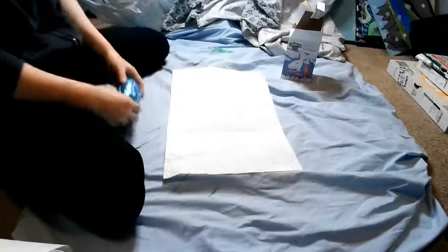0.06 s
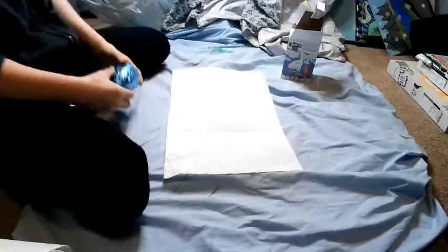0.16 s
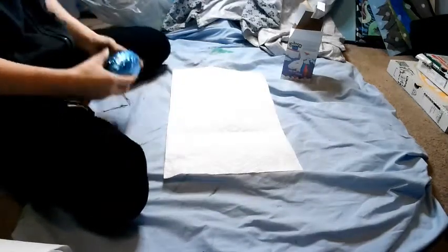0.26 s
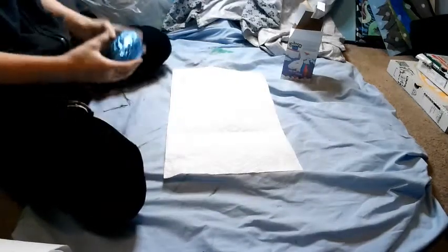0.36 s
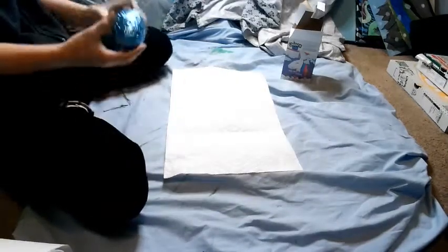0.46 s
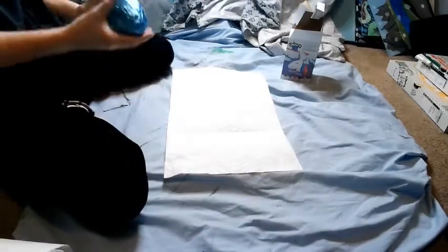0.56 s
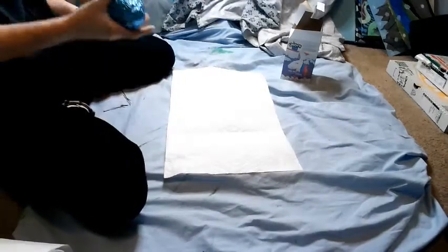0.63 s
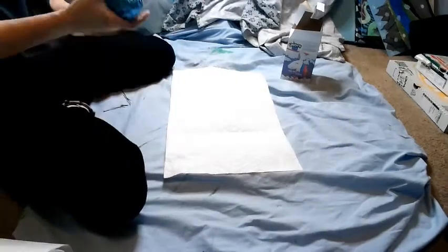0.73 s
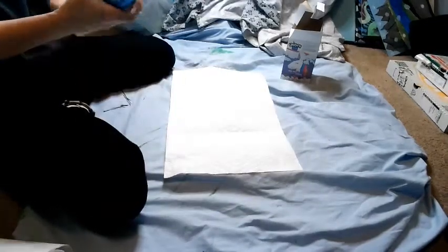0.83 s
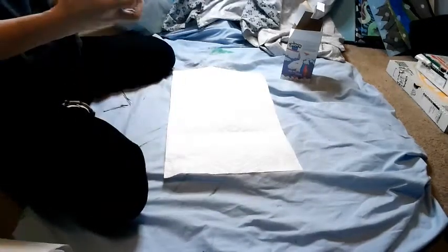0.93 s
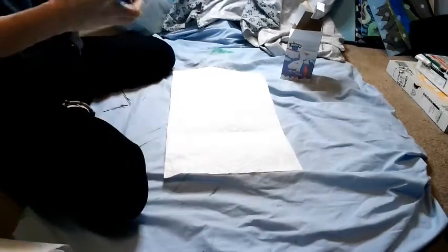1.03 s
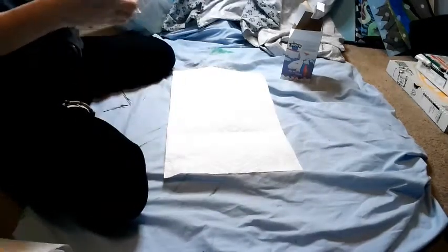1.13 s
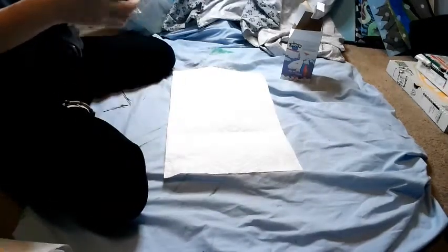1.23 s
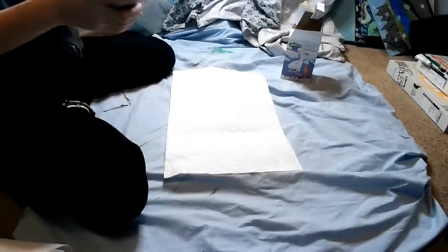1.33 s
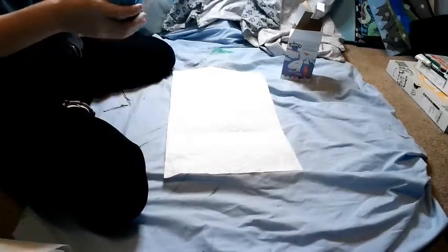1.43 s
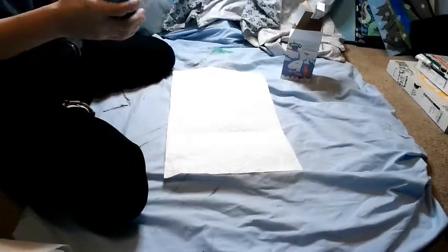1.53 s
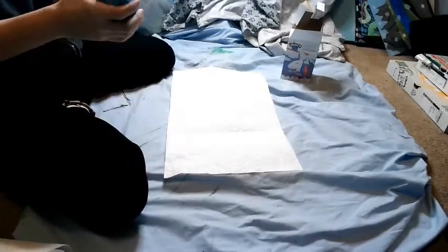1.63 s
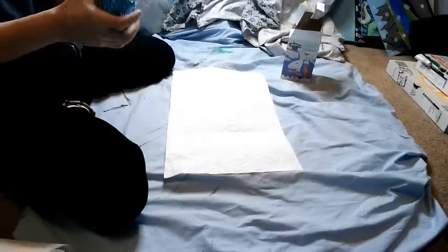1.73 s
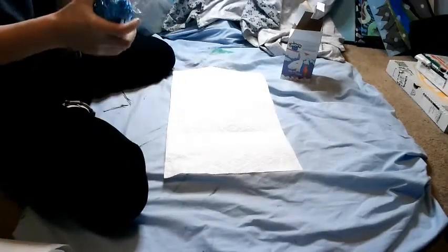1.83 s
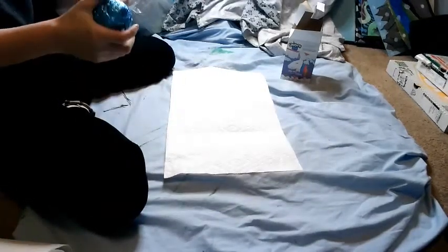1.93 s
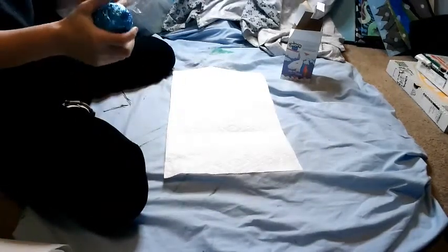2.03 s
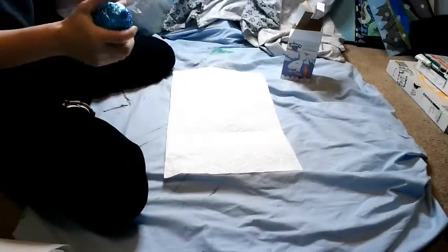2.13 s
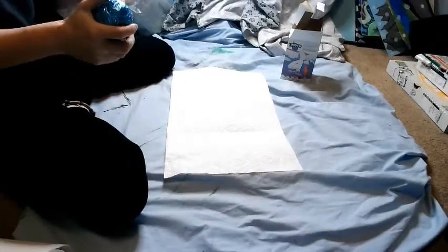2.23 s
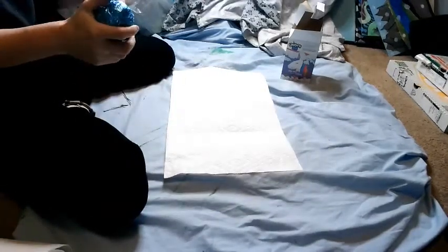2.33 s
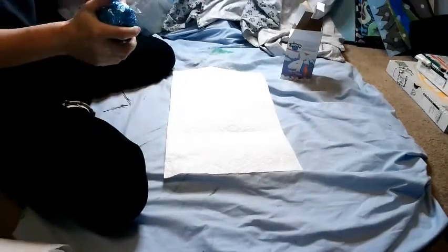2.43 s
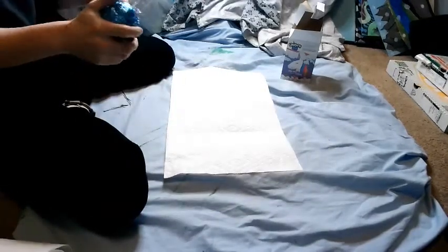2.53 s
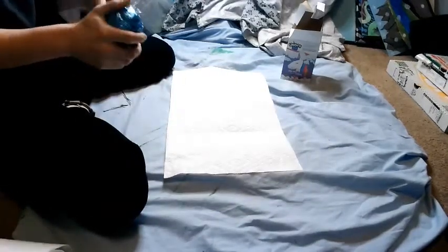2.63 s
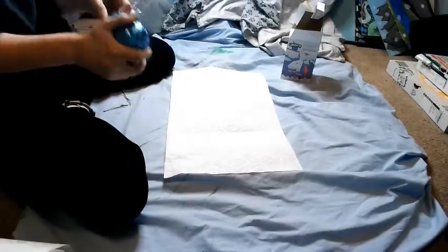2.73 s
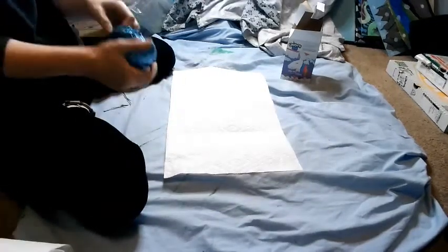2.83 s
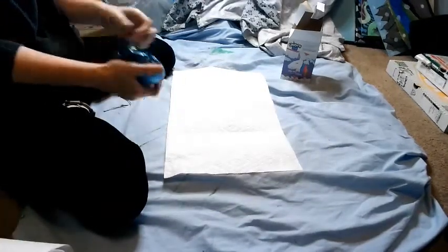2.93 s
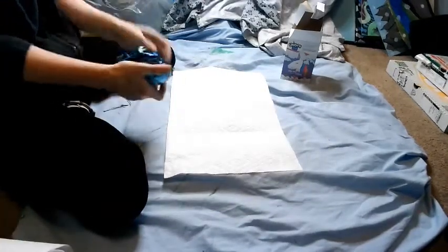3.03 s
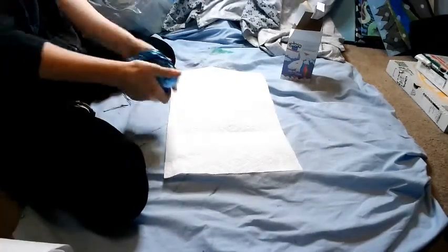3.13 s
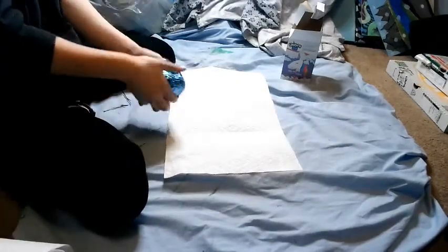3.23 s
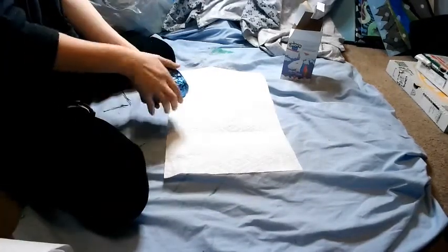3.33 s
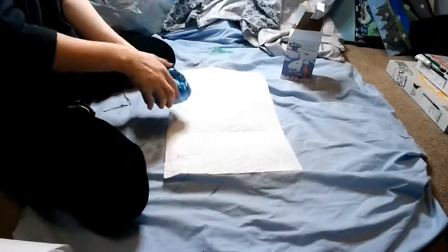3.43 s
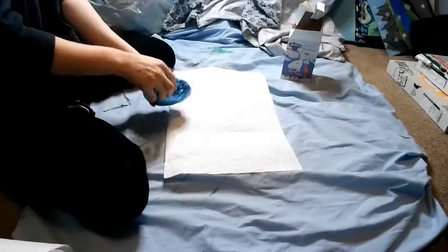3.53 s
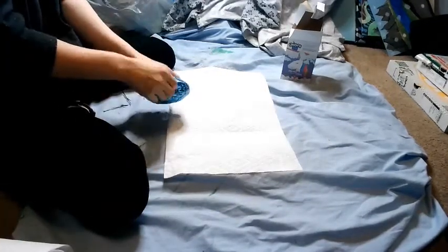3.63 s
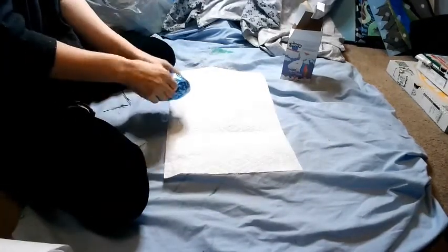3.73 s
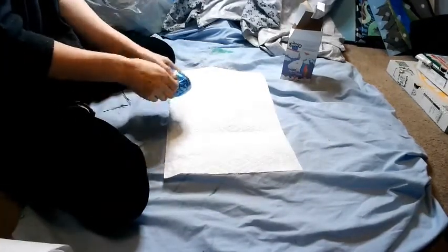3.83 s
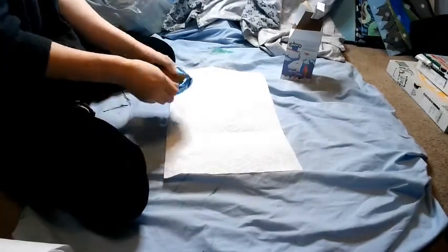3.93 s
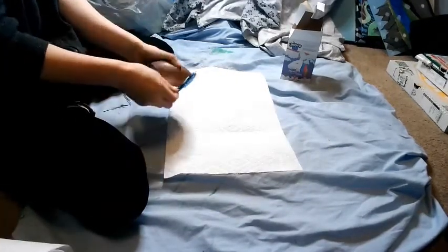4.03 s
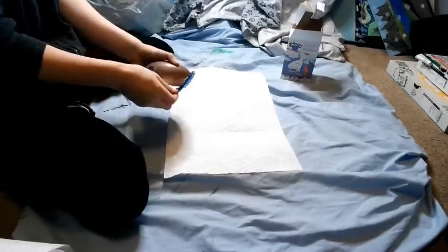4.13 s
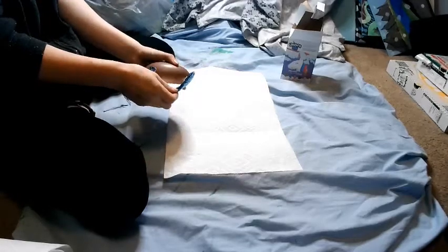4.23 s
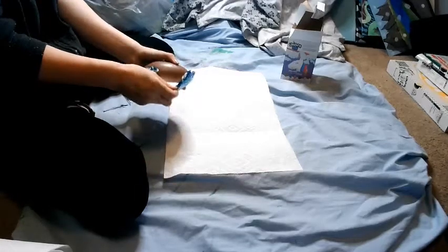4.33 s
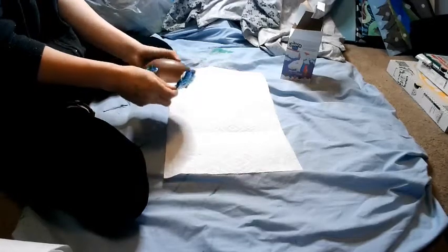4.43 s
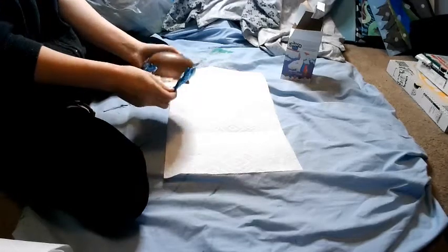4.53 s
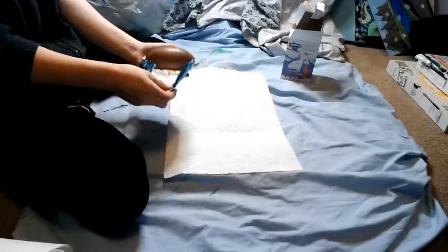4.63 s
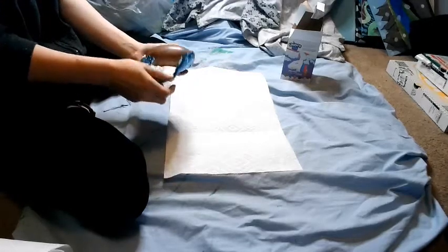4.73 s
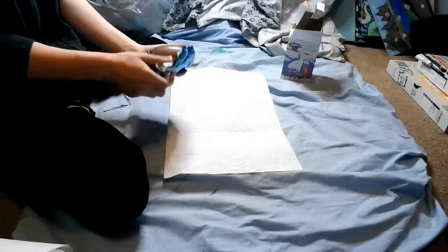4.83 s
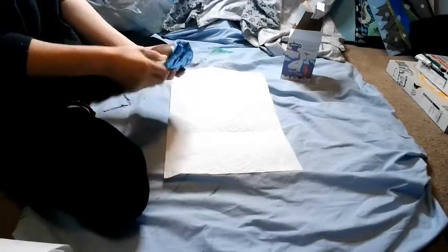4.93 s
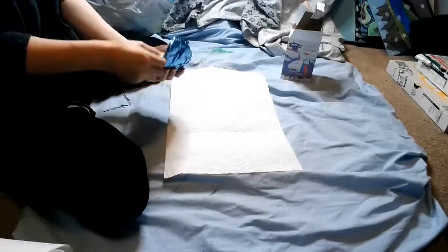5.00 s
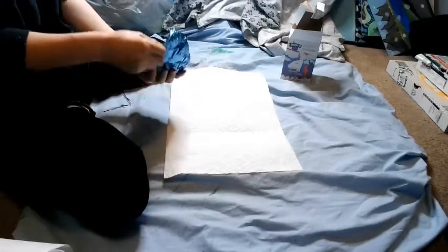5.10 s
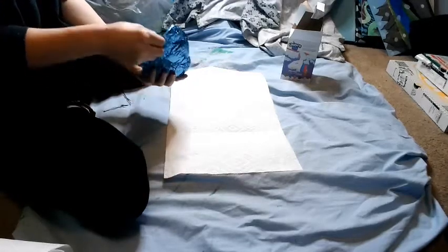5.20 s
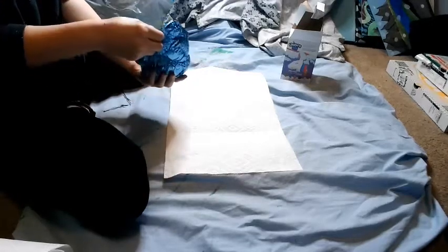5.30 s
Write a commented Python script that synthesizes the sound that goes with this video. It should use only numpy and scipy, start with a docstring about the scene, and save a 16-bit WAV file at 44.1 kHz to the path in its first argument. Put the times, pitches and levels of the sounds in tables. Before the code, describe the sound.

Close, dry foil handling in a quiet, soft-furnished room. At first fingertips brush the thin wrapper with faint hiss and sparse tiny ticks; past the midpoint the grip firms and sharp snaps and crackles crowd together. Later the foil scrapes a hollow chocolate shell, with small dull knocks and a soft sleeve rumble. A faint low machine drone throbs unevenly behind. One microphone, little deep bass, dulled top.

```python
"""Fingers brush over thin foil, then peel it off a hollow chocolate egg in a quiet, soft-furnished room.
Creases snap as clicks and short rings, tiny facets crackle as random grains, flaps rustle lower down.
Foil scrapes the shell, heard through its modes; in the second half fingers knock on it and sleeves rumble.
Behind the hands a machine's uneven drone throbs faintly, with a thin whine, mains hum and room air.
Hands and shell sound through a short room; one microphone with little deep bass and dull treble takes it all."""
import sys
import numpy as np
from scipy import signal
from scipy.fft import rfft, irfft, next_fast_len
from scipy.io import wavfile
from scipy.ndimage import uniform_filter1d, map_coordinates

SR = 44100
rng = np.random.default_rng(int(sys.argv[2]) if len(sys.argv) > 2 else 0)


def inscribe(sig):
    """Save sig as 16-bit PCM at rate SR to the path in sys.argv[1].

    A 1-D sig is mono; a 2-D sig holds one channel per row.
    Samples are clipped to [-1, 1] before scaling.
    """
    pcm = np.round(np.clip(np.atleast_2d(sig).T, -1, 1) * 32767)
    wavfile.write(sys.argv[1], SR, pcm.astype(np.int16))


N = 236328
TIME = np.arange(N) / SR


def amp(db):
    """Decibels to gain."""
    return 10 ** (np.asarray(db) / 20)


def unit(x):
    """x at rms 1."""
    return x / np.sqrt(np.mean(x ** 2) + 1e-20)


def along(points, hz):
    """(Hz, value) points read on a log frequency axis."""
    f, v = np.transpose(points)
    return np.interp(np.log(hz + 1), np.log(f + 1), v)


def level(rows):
    """(s, dB) rows as a gain per sample, at -120 dB before the first."""
    return amp(np.interp(TIME, *np.transpose(rows), left=-120))


def wobble(rate):
    """A smooth random curve of rms 1, rate knots a second."""
    knots = rng.standard_normal(int(N * rate / SR) + 4)
    fine = map_coordinates(knots, [np.arange(6 * len(knots)) / 6])  # cubic, six points per knot
    return unit(np.interp(TIME * rate * 6, np.arange(len(fine)), fine))


def filtered(x, response):
    """x times a response of frequency."""
    m = next_fast_len(N + SR // 2)
    return irfft(rfft(x, m) * response(np.fft.rfftfreq(m, 1 / SR)), m)[:N]


def coloured(x, spectrum, size=2048):
    """x through a causal, minimum-phase filter of energy 1 with this spectrum."""
    cepstrum = irfft(np.log(amp(along(spectrum, np.fft.rfftfreq(size, 1 / SR)))))
    # fold the cepstrum onto positive times
    cepstrum[1:size // 2] *= 2
    cepstrum[size // 2:] = 0
    response = irfft(np.exp(rfft(cepstrum)))
    return signal.oaconvolve(x, response / np.linalg.norm(response))[:N]


def add(track, s, sound):
    """Mix a sound into the track at time s."""
    part = track[max(round(s * SR), 0):][:len(sound)]
    part += sound[:len(part)]


def grains(rate, spread_db, centre_hz, scatter, cycles, size=56):
    """Tiny facets flip at random: each rings a few cycles at its own pitch, and few are large."""
    count = int(rate * N / SR)
    when, strength, pitch = rng.random((count, 3)).T
    hz = np.clip(centre_hz * np.exp(scatter * (2 * pitch - 1)), 200, SR / 3)[:, None]
    turns = (hz * np.arange(size) / SR).astype(np.float32)
    gain = amp(spread_db * np.minimum(-np.log(1 - strength), 3.5))
    ring = np.sin(2 * np.pi * turns) * np.exp(-turns / cycles)
    rings = gain[:, None] * np.sqrt(hz) * ring  # high pitches die sooner, so they start louder
    at = (when * N).astype(int)[:, None] + np.arange(size)
    return unit(np.bincount(at.ravel(), rings.ravel(), N)[:N])


# Finger strokes on the foil. Each row: time of full strength in seconds, attack in seconds per 20 dB,
# hold in seconds, then the drive in dB of the crinkle, of the bending flaps and of the scrape on the shell.
FINGER_STROKES = [(-0.004, 0.042, 0.13, -64, -70, -75), (0.184, 0.036, 0.098, -59.5, -66.5, -92),
                  (0.37, 0.16, 0.023, -56.5, -83, -91), (0.533, 0.13, 0.049, -52, -88, -93),
                  (0.602, 0.097, 0.049, -58, -64, -83), (0.722, 0.045, 0.027, -55.5, -65, -93),
                  (0.8, 0.084, 0.033, -48.5, -81, -92), (0.912, 0.045, 0.034, -58, -79, -90),
                  (1.02, 0.055, 0.1, -65, -73, -97), (1.18, 0.13, 0.046, -56.5, -75, -90),
                  (1.307, 0.013, 0.017, -55, -80, -73), (1.416, 0.071, 0.14, -51, -87, -89),
                  (1.647, 0.048, 0.024, -49.5, -77, -81), (1.8, 0.097, 0.15, -60.5, -78, -76.5),
                  (1.949, 0.064, 0.025, -52.5, -66, -87), (2.032, .04, 0.075, -63.5, -74, -88),
                  (2.155, 0.007, 0.0069, -49, -85, -86), (2.218, 0.011, 0.12, -55.5, -65, -90),
                  (2.378, 0.11, 0.081, -49.5, -53, -72.5), (2.527, 0.0093, 0.03, -54.5, -60, -95),
                  (2.642, 0.026, 0.021, -40.5, -55, -73), (2.723, 0.0045, 0.013, -49, -49, -85),
                  (2.791, 0.041, 0.027, -39, -50.5, -81), (2.83, 0.011, 0.034, -38, -47, -81),
                  (2.882, .04, 0.062, -47.5, -56, -85), (2.962, .002, 0.031, -43.5, -56, -79),
                  (3.033, 0.063, 0.032, -37, -43, -60.5), (3.236, 0.0092, 0.11, -60.5, -66, -79),
                  (3.36, 0.044, 0.02, -48, -52.5, -68), (3.463, 0.076, 0.011, -41, -52.5, -76),
                  (3.53, 0.11, 0.13, -50, -59.5, -71), (3.608, 0.0054, 0.037, -43.5, -46, -68),
                  (3.695, 0.074, 0.031, -45, -51.5, -67), (3.76, .02, 0.044, -51.5, -65, -62.5),
                  (3.797, 0.004, 0.0096, -38.5, -43, -63), (3.878, .01, 0.13, -60.5, -62, -76),
                  (3.993, 0.003, 0.015, -41, -43.5, -68), (4.041, .002, 0.016, -49, -46.5, -80),
                  (4.068, 0.0035, 0.025, -36.5, -47.5, -83), (4.135, 0.02, 0.021, -36, -42, -57),
                  (4.186, 0.011, 0.042, -44.5, -49.5, -56), (4.218, 0.0067, 0.014, -39.5, -46.5, -56.5),
                  (4.37, 0.004, .1, -61, -57, -82), (4.438, .005, 0.046, -51, -60, -61.5),
                  (4.48, 0.006, 0.02, -47.5, -45, -48), (4.518, .02, .02, -52, -51, -52),
                  (4.544, 0.003, 0.0089, -41.5, -40.5, -57), (4.599, 0.05, 0.041, -40, -47, -60),
                  (4.7, 0.028, 0.069, -37, -47, -58.5), (4.829, 0.012, 0.0045, -44, -49, -53.5),
                  (4.95, 0.057, 0.019, -43, -52, -58.5), (4.984, 0.012, 0.013, -35.5, -45, -56.5),
                  (5.135, 0.062, 0.08, -47, -52.5, -61), (5.245, 0.065, 0.096, -50.5, -60.5, -72)]
RELEASE_S = 0.056  # a stroke fades by 20 dB in this time


def strokes():
    """Each stroke swells, holds and fades; it drives the crinkle, the flaps and the scrape by its own amounts."""
    power = np.zeros((3, N))
    for s, attack, hold, *drive_db in FINGER_STROKES:
        before = np.maximum(s - TIME, 0) / max(attack, .002)
        after = np.maximum(TIME - s - hold, 0) / RELEASE_S
        away = before + after
        near = away < 4  # down to -80 dB
        power[:, near] += np.outer(amp(drive_db), amp(-20 * away[near])) ** 2
    return np.sqrt(power)


# Colour of fingertips sliding over the foil. Each row: frequency in Hz, relative level in dB.
BRUSH_COLOUR = [(300, -34), (1500, -17.5), (3000, -17), (4500, -4), (6000, 5.5), (7500, 3), (9500, 1.5),
                (10800, -1), (12500, -9), (15500, -22)]
# Colour of the foil's crackle and of its shivering sheet. Each row: frequency in Hz, relative level in dB.
FOIL_COLOUR = [(300, -36), (1200, -44), (2500, -11), (3600, -6), (4800, -0.5), (6500, 2.5), (8500, 2),
               (10000, -3), (12000, -11.5), (15500, -21)]
RESTING_DB = -74.5  # drive of the foil rustling in the hands between strokes


def crinkle(drive, brush_db=1.5, crackle_db=-1.5, firm_db=-42, grit_db=1.5, clump_db=1.5, tick_db=-5.0):
    """A light touch hisses and ticks over the foil; the firmer the grip, the more its facets crackle."""
    stroke = np.hypot(drive, amp(RESTING_DB))
    firm = stroke / (stroke + amp(firm_db))
    gritty = rng.standard_normal(N) * amp(grit_db * wobble(900))
    hiss = unit(coloured(gritty, BRUSH_COLOUR))
    # now and then a larger facet flips and rings a little longer
    ticks = grains(rate=130, spread_db=3.5, centre_hz=6000, scatter=.45, cycles=1.5, size=96)
    brush = amp(brush_db) * hiss + amp(tick_db) * unit(coloured(ticks, BRUSH_COLOUR))
    crackle = grains(rate=2000, spread_db=2.5, centre_hz=5730, scatter=0.58, cycles=1.2, size=80)
    foil = amp(crackle_db) * unit(coloured(crackle, FOIL_COLOUR))
    touch = np.sqrt(1 - firm) * brush + np.sqrt(firm) * foil
    return stroke * touch * amp(clump_db * wobble(110))


# The larger creases that buckle. Each row: start in seconds, level in dB before gain_db, facet pitch in Hz,
# level of the shell's tick in dB relative to the snap before shell_db, ring's t60 in seconds.
CREASES = [(0.09, -49.5, 4950, -25, 0.0078), (.1795, -46, 7400, -25, 0.0047), (.193, -47, 8150, -30, .004),
           (.3558, -48, 7250, -30, 0.0045), (.365, -43.5, 8700, -17, .005), (0.374, -42, 7600, -30, 0.0032),
           (.4228, -42.5, 6660, -24, 0.0057), (.4565, -36.5, 7080, -38, 0.0088),
           (.471, -45, 6600, -30, .005), (0.5138, -47, 8100, -30, .004), (0.5175, -38.5, 7300, -35, 0.0047),
           (0.7343, -36, 6030, -39, 0.0028), (0.881, -49, 6000, -8, 0.0017),
           (.927, -41.5, 8700, -21, 0.0036), (.9893, -50, 4570, -40, 0.0073),
           (1.078, -46, 6840, -22, 0.0021), (1.198, -41, 6700, -22, 0.0035),
           (1.3084, -42, 6000, -12, 0.0045), (1.2885, -50.5, 6540, -25, 0.003),
           (1.4004, -44, 8450, -28, 0.0047), (1.4187, -43, 6400, -16, 0.0048),
           (1.5243, -44, 7200, -28, 0.0038), (1.542, -48, 5900, -25, .005),
           (1.644, -40.5, 6300, -28, 0.0055), (1.649, -40, 8300, -30, 0.006),
           (1.6776, -46, 7100, -30, .004), (1.6828, -41, 6960, -30, 0.0048),
           (1.8113, -45.5, 6200, -28, 0.0058), (1.9475, -41, 5930, -28, .004),
           (1.953, -44.5, 5080, -33, 0.0035), (2.085, -48, 5330, -30, .005),
           (2.142, -46.5, 4550, -19, 0.0067), (2.153, -36.5, 5100, -30, 0.0035),
           (2.2173, -31.5, 5080, -26.5, 0.003), (2.27, -43, 5800, -40, 0.0045),
           (2.2947, -40, 5270, -23, 0.0036), (2.332, -39, 5000, -13.5, 0.0038),
           (2.407, -38.5, 8500, -28, 0.0038), (2.428, -36, 5070, -29, 0.0046),
           (2.4525, -40, 9200, -6.5, 0.0045), (2.5154, -36.5, 5540, -18.5, 0.0079),
           (2.519, -38, 5500, -22, .005), (2.5638, -45.5, 4960, -32, 0.0054),
           (2.5873, -39, 4750, -18, 0.0073), (2.622, -32.5, 5300, -20, 0.0037),
           (2.6302, -35, 6960, -30, .004), (2.639, -28.5, 5070, -26, 0.0058),
           (2.6493, -29.5, 4900, -25, 0.0047), (2.6538, -32, 6000, -20, .003),
           (2.6632, -30, 5000, -19.5, 0.0038), (2.6823, -34, 6240, -30, 0.0028),
           (2.7216, -23, 5730, -45, 0.0038), (2.7419, -34, 6500, -32, .004),
           (2.7634, -28.5, 6030, -21, 0.0038), (2.7664, -33, 4900, -28, 0.0032),
           (2.7897, -32, 5500, -25, .003), (2.7947, -20.5, 5300, -23, .0018),
           (2.802, -28, 8300, -43, 0.0031), (2.8095, -27, 7440, -38, 0.0044),
           (2.8238, -18, 4170, -19.5, 0.0034), (2.8256, -27, 4360, -17, 0.0035),
           (2.833, -28, 5500, -33, .003), (2.858, -29, 5330, -35, .004), (2.8411, -23, 5230, -45, 0.0053),
           (2.863, -27, 5300, -30, 0.004), (2.897, -24.5, 6160, -43, 0.0039), (2.924, -35, 5850, -28, .003),
           (2.935, -36, 5150, -30, 0.0033), (2.9555, -21.5, 4840, -29, 0.005),
           (3.013, -36, 5500, -25, .004), (3.032, -32.5, 4500, -30, .004), (3.1, -39, 7000, -33, .003),
           (3.1153, -32, 5830, -38, 0.0056), (3.2379, -40.5, 7150, -13, 0.0043),
           (3.272, -28, 6800, -45, 0.0058), (3.291, -37.5, 6600, -30, .005),
           (3.3161, -40.5, 4960, -28, 0.0045), (3.3248, -37, 6840, -16, .005),
           (3.339, -36, 4740, -9, 0.0067), (3.3571, -31.5, 3700, -14, 0.0028),
           (3.365, -35, 5400, -10, 0.0044), (3.3717, -36.5, 6340, -27, 0.0041),
           (3.4665, -36, 6730, -6, 0.0035), (3.471, -33, 7000, -14, 0.003), (3.5456, -42, 7050, -30, .003),
           (3.6154, -34, 6700, -6.5, 0.0044), (3.7077, -32, 6130, -36, 0.007),
           (3.7696, -35, 4950, -22, 0.0022), (3.7994, -43, 5000, -3, 0.0057),
           (3.8056, -43, 6900, -18, .004), (3.824, -33, 7600, -28, .003), (3.828, -31.5, 7300, -36, 0.004),
           (3.8948, -33, 8700, -23, 0.0026), (3.969, -44, 6500, -28, 0.005),
           (3.995, -29, 4480, -7.5, 0.0039), (3.9961, -31, 4900, -10, 0.0065),
           (4.007, -39, 6060, -25, .005), (4.0355, -27, 5650, -15, 0.0029), (4.0498, -34, 6740, -25, .005),
           (4.0564, -33, 5900, -27, 0.006), (4.0684, -22.5, 7400, -14.5, 0.0022),
           (4.0846, -29, 7740, -31, .004), (4.1024, -25.5, 6100, -30, .003), (4.116, -34, 6000, -35, .004),
           (4.1187, -25.5, 5300, -42, .004), (4.1218, -30, 6500, -35, .003), (4.135, -29, 5800, -17, .004),
           (4.1455, -25.5, 5750, -25, 0.0047), (4.152, -27, 5800, -25, .004),
           (4.165, -31, 5450, -28, 0.0036), (4.1719, -30, 6300, -30, 0.0034),
           (4.2111, -28.5, 5470, -30, 0.0054), (4.219, -32, 5040, -7, .002),
           (4.2279, -24.5, 5340, -12, 0.0023), (4.2306, -33, 5370, -9, 0.0046),
           (4.2412, -28.5, 6700, -18, 0.0082), (4.307, -49, 7500, -20, 0.004),
           (4.3673, -37.5, 4300, -17, 0.0073), (4.4265, -32, 6140, -29, 0.0043),
           (4.4585, -34.5, 5540, -6, 0.003), (4.4742, -32, 6240, -14, 0.0039),
           (4.4822, -35.5, 4860, -3, 0.0076), (4.52, -35, 5900, -20, .004), (4.5295, -38, 4200, -18, .004),
           (4.5469, -27.5, 7140, -11, 0.0067), (4.5761, -25, 3720, -44, 0.0056),
           (4.6323, -28, 4730, -9.5, 0.0034), (4.6349, -27, 7240, -34, 0.0057),
           (4.6633, -30, 4900, -32, 0.0037), (4.687, -40, 7450, -17, .005), (4.701, -32, 7600, -28, .004),
           (4.7046, -27, 7700, -36, 0.0035), (4.7235, -32, 6450, -30, .004),
           (4.757, -27, 6900, -30, 0.0034), (4.761, -26, 7900, -34, 0.0051),
           (4.8255, -23.5, 3300, -8, 0.0013), (4.8415, -42, 3200, -10, .005), (4.943, -41, 6050, -20, .005),
           (4.984, -29, 7700, -26, 0.0044), (4.9854, -39, 3400, -25, 0.0093),
           (4.9998, -30, 8200, -32, 0.0092), (5.0296, -31.5, 5900, -13.5, 0.0042),
           (5.1312, -37, 4900, -21, 0.0044), (5.156, -42, 5330, -20, 0.0056),
           (5.1816, -35.5, 6900, -30, .005), (5.2644, -29.5, 5430, -11, 0.0029),
           (5.311, -24.5, 6650, -43, 0.0021), (5.313, -35, 6600, -38, 0.0074),
           (5.325, -33, 5160, -24, 0.0054), (5.3474, -40, 7600, -32, 0.0041)]
# Colour of contact with the shell, scraped or ticked. Each row: frequency in Hz, relative level in dB.
CONTACT_COLOUR = [(40, -71), (120, -18), (240, -17), (370, -5.5), (480, -2.5), (680, -3.5), (1000, -5.5),
                  (1400, -3), (2100, 2), (2800, 2), (4000, -4.5), (9000, -52)]


def snaps(upper=1.503, upper_db=-7, crack_db=-7.5, shiver_db=-18, shiver_t60=0.032, gain_db=8,
          shell_db=-8.0, cutoff=0.62, reach=2.02, click_db=-9, click_s=.00036):
    """A crease pops: a click sweeps down, the facet rings briefly, the sheet shivers and the shell ticks."""
    facets, sheet, shell = np.zeros((3, N))
    t = np.arange(SR // 30) / SR
    rise = 1 - np.exp(-(t / .00011) ** 2)
    ticking = amp(shell_db - 60 * t / 0.012)
    flash = (t / click_s) ** 2 * np.exp(1 - (t / click_s) ** 2)
    for s, db, hz, under_db, t60 in CREASES:
        ringing = rise * amp(-60 * t / t60)
        burst = np.hypot(amp(crack_db) * ringing, amp(shiver_db - 60 * t / shiver_t60))
        crack, tick = rng.standard_normal((2, len(t)))
        second_hz = min(hz * upper, 10000) * np.exp(0.091 * rng.standard_normal())
        ring = np.sin(2 * np.pi * hz * t) + amp(upper_db) * np.sin(2 * np.pi * second_hz * t)
        # treble leads: the click sweeps down through the facet's pitch as it peaks
        turns = hz * click_s * (3 - 4 * click_s / (t + click_s))
        click = amp(click_db) * flash * np.sin(2 * np.pi * turns)
        # a facet radiates little far below or above its own pitch
        band_hz = [min(cutoff * hz, SR / 5), min(reach * hz, SR / 2.4)]
        thin = signal.butter(2, band_hz, "band", fs=SR)
        add(facets, s, amp(db) * signal.lfilter(*thin, ring * ringing + click))
        add(sheet, s, amp(db) * signal.lfilter(*thin, crack * burst))
        add(shell, s, amp(db + under_db) * tick * ticking)
    return amp(gain_db) * (facets + coloured(sheet, FOIL_COLOUR) + coloured(shell, CONTACT_COLOUR))


# Colour of bending flaps. Each row: frequency in Hz, relative level in dB.
FLAP_COLOUR = [(400, -27), (1000, -24.5), (1800, -11), (2800, -3.5), (4000, 2), (5500, 1), (9000, -38)]


def folds(drive, rub_db=-3, gain_db=0, clump_db=2.0):
    """Broad flaps bend with a fine, dry rustle, lower than that of the small facets."""
    flips = grains(rate=1800, spread_db=2, centre_hz=3034, scatter=0.654, cycles=1.5, size=96)
    rub = amp(rub_db) * rng.standard_normal(N)
    texture = unit(coloured(flips + rub, FLAP_COLOUR))
    return texture * drive * amp(gain_db + clump_db * wobble(90))


# Modes of the hand-damped shell. Each row: frequency in Hz, relative level in dB, t60 in seconds.
SHELL_MODES = [(182, -18, 0.073), (319, -1, 0.13), (366, 3.5, 0.091), (507, -5.5, 0.078), (661, 2, 0.058),
               (725, -3, 0.083), (1385, -2, 0.18), (1784, 9, 0.029), (2080, 10.5, 0.054), (2664, 9, 0.053),
               (3280, -13, .04)]


def scrape(drive, rub_db=-2, gain_db=-1, clump_db=2.5, ring_db=-2):
    """Foil sticks and slips on the shell, whose modes give the crackle a lower, hollow voice."""
    slips = grains(rate=600, spread_db=2.5, centre_hz=1180, scatter=0.98, cycles=0.22, size=160)
    rub = amp(rub_db) * rng.standard_normal(N)
    texture = unit(coloured(slips + rub, CONTACT_COLOUR))
    contact = texture * drive * amp(gain_db + clump_db * wobble(60))
    t = np.arange(SR // 6) / SR
    ring = sum(amp(db - 60 * t / t60) * np.sin(2 * np.pi * hz * t) for hz, db, t60 in SHELL_MODES)
    hollow = unit(signal.fftconvolve(contact, ring)[:N]) * contact.std()
    return contact + amp(ring_db) * hollow


def flexing(x, patchy_db=2.5, size=512):
    """As the sheet bends, its narrow resonances shift from moment to moment."""
    z = signal.stft(x, nperseg=size)[2]
    field = uniform_filter1d(rng.standard_normal(z.shape), size=5, axis=0)  # smooth over frequency
    field = uniform_filter1d(field, size=7, axis=1)  # and over time
    return unit(signal.istft(z * amp(patchy_db * unit(field)), nperseg=size)[1][:N]) * x.std()


# Knocks on the bare shell. Each row: start in seconds, level in dB before the thud's and modes' own gains,
# frequency in Hz of the modes that the spot favours.
SHELL_KNOCKS = [(2.781, -49.5, 700), (3.997, -45, 750), (4.054, -55, 1400), (4.135, -48, 700),
                (4.147, -47, 620), (4.2195, -43, 1400), (4.228, -38.5, 745), (4.483, -39, 633),
                (4.498, -41, 600), (4.531, -48, 600), (4.5388, -39.5, 1400), (4.548, -44, 750),
                (4.700, -42.5, 367), (4.826, -42, 405), (4.839, -36, 343), (4.954, -43, 356),
                (4.965, -45.5, 300), (5.132, -50.5, 300)]


def knocks(gain_db=-8, octave_db=-7.5, thud_db=-1, thud_t60=0.0087, thud_reach=1.9):
    """A finger thuds on the hollow shell; the spot picks modes that start together, die fast and vary."""
    track, t = np.zeros(N), np.arange(SR // 4) / SR
    rise = 1 - np.exp(-t / 0.00038)
    for s, db, spot_hz in SHELL_KNOCKS:
        pad = signal.butter(2, [spot_hz / thud_reach, spot_hz * thud_reach], "band", fs=SR)
        thud = unit(signal.lfilter(*pad, rng.standard_normal(len(t))))
        add(track, s, amp(db + thud_db - 60 * t / thud_t60) * rise * thud)
        for hz, mode_db, t60 in SHELL_MODES:
            strength, shift = rng.standard_normal(2)  # the grip shifts each mode a little
            spot_db = octave_db * abs(np.log2(hz / spot_hz))
            ring = np.sin(2 * np.pi * hz * (1 + 0.0061 * shift) * t) * rise
            add(track, s, amp(db + gain_db + mode_db + spot_db + strength - 60 * t / t60) * ring)
    return track


# The egg settling into a palm. Each row: start in seconds, level in dB.
PALM_THUMPS = [(2.19, -62), (2.826, -55)]


def thumps(push_hz=55, push_s=0.0069):
    """The egg meets a palm with one soft, low push."""
    track, t = np.zeros(N), np.arange(SR // 8) / SR
    push = np.sin(2 * np.pi * push_hz * t) * t / push_s * np.exp(1 - t / push_s)
    for s, db in PALM_THUMPS:
        add(track, s, amp(db) * push)
    return track


# Arms and sleeves shifting. Each row: time in seconds, level in dB before gain_db.
SLEEVE_LEVEL = [(3.7, -66), (4.2, -61.5), (4.72, -57), (4.84, -50.5), (5.05, -55.5), (5.36, -54.5)]
# Colour of the cloth. Each row: frequency in Hz, relative level in dB.
CLOTH_COLOUR = [(30, -41), (70, -35), (110, 6.5), (170, 1), (350, -9.5), (600, -20), (2000, -28.5)]


def sleeves(gain_db=-1):
    """Cloth rumbles softly as the arms pull."""
    return unit(coloured(rng.standard_normal(N), CLOTH_COLOUR)) * level(SLEEVE_LEVEL) * amp(gain_db)


# The decay of the soft-furnished room. Each row: frequency in Hz, t60 in seconds.
ROOM_DECAY = [(200, 0.16), (3000, 0.44), (12000, 0.024)]


def room(x, wet_db=-18, near_db=-14, count=10):
    """The moving hands throw early reflections that come and go; a short diffuse tail follows."""
    hz, t, z = signal.stft(rng.standard_normal(SR // 3), SR, nperseg=256)
    tail = signal.istft(z * amp(-60 * t / along(ROOM_DECAY, hz)[:, None]), SR, nperseg=256)[1]
    tail = np.pad(tail, (SR // 250, 0))  # the tail waits 4 ms
    late = signal.fftconvolve(x, tail / np.linalg.norm(tail))[:N]
    early = np.zeros(N)
    for delay in rng.uniform(.0006, .007, count):
        add(early, delay, x * wobble(2.91))
    return x + amp(near_db) * early / np.sqrt(count) + amp(wet_db) * late


def wavering(centre_hz, wander_hz):
    """A tone of rms 1 whose pitch drifts about, by wander_hz rms."""
    return unit(np.sin(2 * np.pi * np.cumsum(centre_hz + wander_hz * wobble(18)) / SR))


# Uneven level of a machine's drone in the room. Each row: time in seconds, level in dB before its quick waver.
DRONE_LEVEL = [(0, -59), (.25, -77), (.45, -59.5), (.62, -58.5), (.9, -60.5), (1.25, -59.5), (1.41, -57),
               (1.55, -62), (2.05, -62.5), (2.24, -54), (2.62, -66), (2.78, -59), (2.9, -61.5),
               (3.1, -66.5), (3.4, -57), (3.6, -66), (3.9, -55), (4.05, -59.5), (4.18, -50.5),
               (4.32, -59.5), (4.49, -51), (4.66, -59), (5.15, -59.5), (5.29, -48.5), (5.36, -55)]
# Mains hum. Each row: frequency in Hz, level in dB rms before its flutter.
MAINS_LINES = [(60, -86), (120, -70), (239, -76)]
# Colour of the room's air. Each row: frequency in Hz, relative level in dB.
AIR_COLOUR = [(25, -13), (50, -6.5), (85, -1), (175, 5.5), (210, -4.5), (265, -7), (315, 0), (400, -9.5),
              (600, -11), (900, -16), (2000, -21), (4000, -21), (6000, -18.5), (16000, -22.5)]
THROB_PER_S, THROB_CREST_S = 5.03, .038  # the drone beats: its rate and first crest
THROB_DEPTH = 0.65  # the weaker of two beating tones over the stronger


def hum(drone_db=0, waver_db=2.0, whine_db=-83.0, air_db=-62.5, flutter_db=2.5, flicker_db=2.1):
    """A throbbing drone with a thin whine above it, wavering mains lines and the faint rush of the room."""
    beat = np.exp(2j * np.pi * THROB_PER_S * (TIME - THROB_CREST_S))
    throb = unit(np.abs(1 + THROB_DEPTH * beat))
    drone = wavering(centre_hz=145.2, wander_hz=2.76) * throb
    drone *= level(DRONE_LEVEL) * amp(drone_db + waver_db * wobble(20))
    whine = wavering(centre_hz=656, wander_hz=2.76) * amp(whine_db + flicker_db * wobble(9))
    mains = np.zeros(N)
    for hz, db in MAINS_LINES:
        line = np.sqrt(2) * np.sin(2 * np.pi * (hz * TIME + rng.random()))
        mains += amp(db + flutter_db * wobble(9)) * line
    rush = filtered(rng.standard_normal(N), lambda hz: amp(along(AIR_COLOUR, hz)))
    return drone + whine + mains + amp(air_db) * unit(rush)


def scene():
    """The unwrapping in its room, over the hum."""
    grip, bend, drag = strokes()
    small_facets = flexing(crinkle(grip), patchy_db=2.15)
    broad_foil = flexing(folds(bend) + scrape(drag), patchy_db=3.0)
    hands = room(small_facets + broad_foil + snaps() + knocks())
    return (hands + thumps() + sleeves() + hum())[None]


TOP_HZ = 15750  # the microphone's band limit


def record(dry):
    """The microphone thins the deep bass, dulls the top octave and keeps nothing above its band limit."""
    # each row: frequency in Hz, response in dB
    microphone = [(25, -15.5), (80, 2.0), (9000, -2.0), (12000, -7.0), (15500, -10.5)]
    return filtered(dry[0], lambda hz: amp(along(microphone, hz)) * (hz < TOP_HZ))[None]


dry = scene()
out = record(dry)
inscribe(out)
```